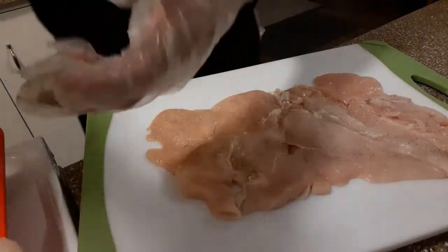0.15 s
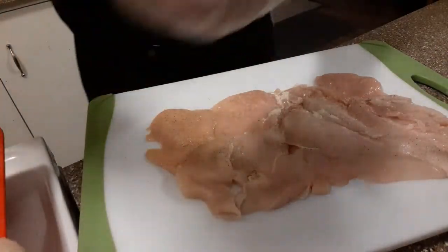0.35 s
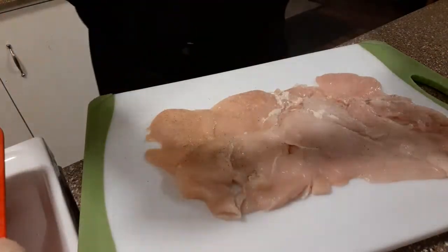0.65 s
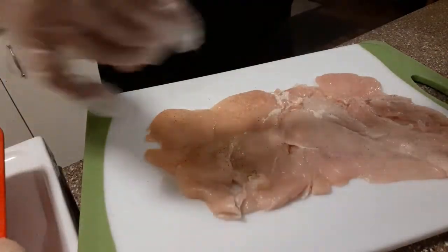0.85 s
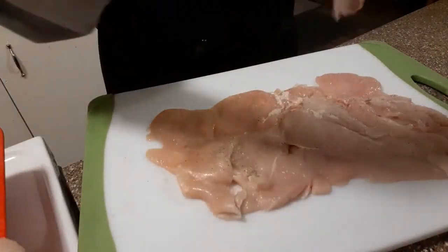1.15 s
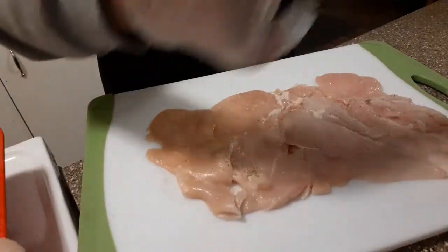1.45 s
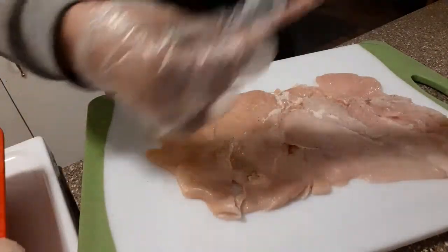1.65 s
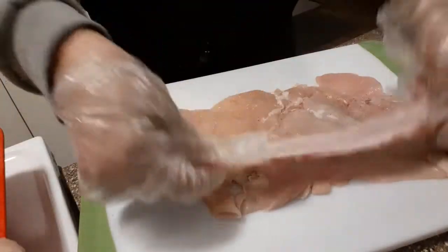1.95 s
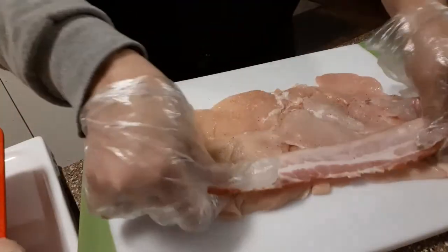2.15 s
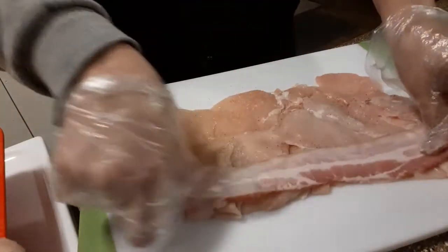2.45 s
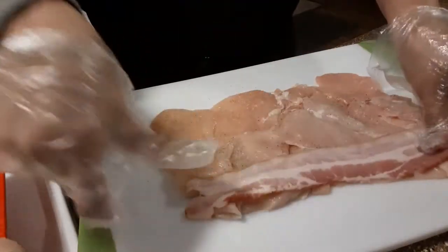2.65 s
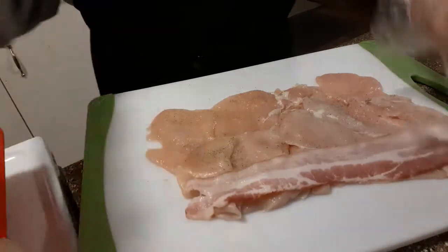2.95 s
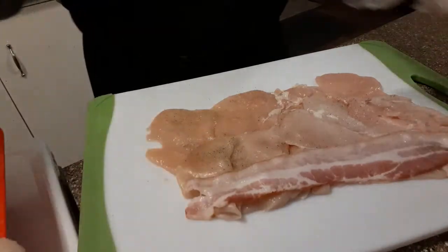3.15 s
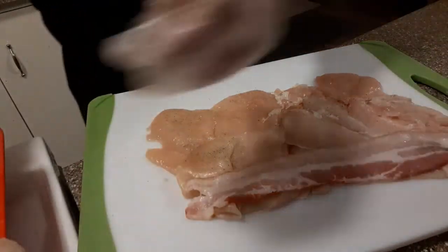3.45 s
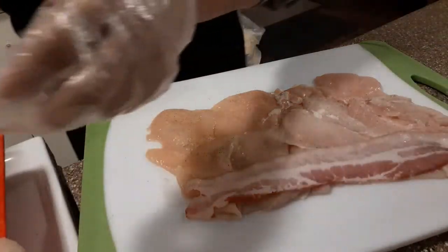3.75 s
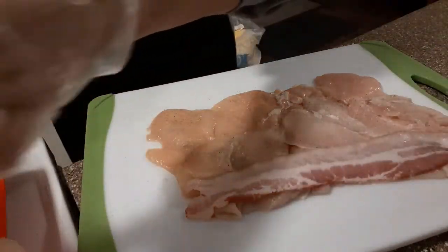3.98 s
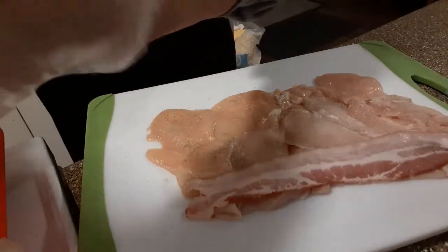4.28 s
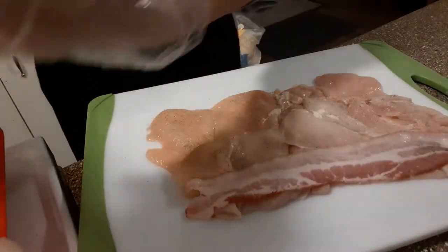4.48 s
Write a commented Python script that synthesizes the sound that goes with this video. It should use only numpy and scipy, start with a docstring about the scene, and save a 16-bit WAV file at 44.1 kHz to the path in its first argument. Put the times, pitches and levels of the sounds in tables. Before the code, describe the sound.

Thin plastic gloves crinkle and crackle close by in uneven swells, with a few sharp pops, over faint hiss and low room rumble.

```python
"""In a kitchen, thin plastic gloves rustle close to a two-port camera microphone as hands lay strips of meat on a board.
The film buckles in random snaps, up to thousands a second, under overlapping swells of movement; a few pops stand out.
A short room tail and a near echo colour the gloves. Shaped noise makes the low rumble with its fuzzy hum,
and a steady faint hiss. Quiet narrow bands of the low range drop out."""
import sys
import numpy as np
from scipy import signal
from scipy.fft import rfft, irfft
from scipy.io import wavfile
from scipy.ndimage import uniform_filter1d

SR = 44100
rng = np.random.default_rng(int(sys.argv[2]) if len(sys.argv) > 2 else 0)


def voltage_ratio(level):
    """Linear amplitude factor for a level in decibels (scalar or array-like)."""
    return 10 ** (np.asarray(level, float) / 20)


def digitize_waveform(pressure):
    """Quantize a signal to 16-bit integers and store it at the path in sys.argv[1].

    Rows of a 2-D input are taken as channels; values are limited to [-1, 1].
    """
    field = np.atleast_2d(pressure).T
    bounded = np.clip(field, -1, 1)
    quanta = np.round(bounded * 32767).astype(np.int16)
    wavfile.write(sys.argv[1], SR, quanta)


N = 203742


def evened(x):
    """Scales to rms 1 over all channels together."""
    return x / np.sqrt(np.mean(x ** 2) + 1e-20)


def read_spectrum(points, hz):
    """Reads a spectrum table on a log-frequency axis."""
    f, value = np.transpose(points)
    return np.interp(np.log(hz + 1), np.log(f + 1), value)


def along(rows):
    """Joins the points of each column of a time table into one value a sample."""
    s, *columns = np.transpose(rows)
    return [np.interp(np.arange(N) / SR, s, column) for column in columns]


def coloured(x, gain):
    """Filters by a gain that is a function of frequency."""
    return irfft(rfft(x) * gain(np.fft.rfftfreq(N, 1 / SR)), N)


def drift(size):
    """Slow random wander of rms 1, smooth over about size samples."""
    noise = rng.standard_normal(N)
    return evened(uniform_filter1d(uniform_filter1d(noise, size), size))


def left_right(side_db):
    """Gains of both ports that split a left-over-right difference in dB evenly."""
    return voltage_ratio(np.array([[0.5], [-0.5]]) * side_db)


# Colour of rustle and hiss at each port:
# (frequency [Hz], left density [dB per Hz, relative], right density [dB per Hz, relative])
PORT_COLOUR = [(70, -72, -55), (204, -25, -17.5), (302, -25, -22), (410, -13, -32.5), (515, -15.5, -21),
               (605, -16, -16), (790, -14.5, -16), (945, -12, -23), (1386, -14.5, -10.5),
               (1720, -13.5, -15), (2150, -9, -11.5), (3700, -10, -10.5), (4070, -10, -9),
               (5550, -10.5, -11), (7870, -10, -7), (8470, -1, -8.5), (9820, -5, -7.5), (11570, -2, -3.5),
               (15770, -5, -9), (15700, -33, -38)]


def port_colour(hz):
    """Colour of rustle and hiss at each port, as a gain."""
    f, *sides = np.transpose(PORT_COLOUR)
    return voltage_ratio([read_spectrum(np.transpose([f, side]), hz) for side in sides])


# Hand moves, each a swell of crumpling:
# (peak time [s], rise [s], fall [s], bright level at peak [dB], middle body against bright [dB])
HAND_MOVES = [(.04, 0.23, 0.067, -45, -10), (0.138, 0.045, 0.039, -46, -9), (.2, 0.025, 0.03, -49.5, -9.5),
              (0.269, 0.036, 0.063, -52, -9.5), (0.352, 0.011, 0.14, -44.5, -10),
              (0.432, .05, 0.028, -39.5, -10), (0.481, .04, 0.059, -42.5, -8.5),
              (0.644, 0.08, .1, -34.5, -12), (.75, 0.12, 0.12, -44.5, -4.5), (.83, 0.065, 0.086, -34.5, -8),
              (0.938, .08, 0.024, -37, -10.5), (1.1, 0.19, .2, -43.5, -16),
              (1.309, 0.35, 0.11, -34.5, -8.5), (1.409, 0.051, 0.14, -37.5, -11),
              (1.57, .08, 0.038, -50, -9), (1.691, 0.15, 0.066, -43, -9.5), (1.819, 0.19, 0.19, -40, -12),
              (2.001, 0.045, 0.21, -37, -7.5), (2.06, 0.11, 0.17, -44, -3), (2.2, .12, 0.22, -35, -9.5),
              (2.36, 0.36, 0.17, -34.5, -11), (2.551, 0.17, 0.024, -36, -12),
              (2.68, 0.25, 0.084, -46.5, -11.5), (2.843, 0.13, 0.16, -34, -10.5),
              (3.108, .05, 0.054, -40, -13), (3.265, 0.1, .18, -36.5, -8), (3.37, 0.18, 0.033, -37.5, -5.5),
              (3.501, .15, 0.17, -44.5, -6), (3.579, 0.21, 0.037, -38.5, -10),
              (3.68, 0.087, 0.09, -51, -15), (3.82, 0.079, 0.17, -33, -11), (3.93, 0.11, 0.15, -40, -7),
              (4.08, .15, 0.13, -42, -14), (4.23, 0.11, 0.046, -37.5, -7.5), (4.33, 0.22, 0.2, -42, -9.5),
              (4.431, 0.099, 0.033, -41, -10.5), (4.49, 0.021, 0.022, -41.5, -8.5),
              (4.572, .05, 0.083, -38.5, -9)]


def moves():
    """Levels in dB of the bright crumpling and of the middle body: the powers of all moves add up."""
    peak_s, rise_s, fall_s, peak_db, body_db = np.transpose(HAND_MOVES)[..., None]
    t = np.arange(0, N + 64, 64) / SR
    # each move alone is 10 dB under its peak one rise before and one fall after it
    bright_db = peak_db - 10 * np.maximum((peak_s - t) / rise_s, (t - peak_s) / fall_s)
    powers = [(voltage_ratio(level) ** 2).sum(0) for level in (bright_db, bright_db + body_db)]
    return [np.interp(np.arange(N) / SR, t, 10 * np.log10(p)) for p in powers]


def folds(count, shared, tonal):
    """Short dying bursts, each with its own pitch; a fold radiates unevenly, so the ports hear only a part alike."""
    t = np.arange(200) / SR
    same, left, right = rng.standard_normal((3, count, len(t)))
    burst = np.array([left, right]) * np.sqrt(1 - shared) + same * np.sqrt(shared)
    pitch_hz = np.linspace(1000, 16000, count)[:, None]
    # start phase in cycles: random for each fold, partly different at each port
    phase = rng.random((count, 1)) + 0.63 * rng.random((2, count, 1))
    burst += tonal * np.sin(2 * np.pi * (pitch_hz * t + phase))
    decay_s = 0.0005 * rng.uniform(0.5, 2.42, (count, 1))
    burst *= np.exp(-t / decay_s)
    return burst / np.linalg.norm(burst, axis=2, keepdims=True)


# Head start of the left port: (time [s], lead [samples])
LEFT_LEAD = [(0, 2), (2.5, 3), (2.8, 18), (4.62, 18)]


def crackle(spread_db=2.0, clump_db=1.0, flurry_db=0.28, thinning=0.7, busy_db=-38):
    """Random snaps of uneven size in clumps, rms 1; gentle movement folds the film less often, in lumps."""
    snaps_per_s, kinds = 9000, 32  # the rate is for a fully busy film
    bright_db = moves()[0]
    busy = np.clip(voltage_ratio(thinning * (bright_db - busy_db)), 0.1, 1)
    happens = rng.random(N) < busy * snaps_per_s / SR
    size = voltage_ratio(spread_db * np.minimum(rng.exponential(1, N), 5)) * happens
    clumps_db = clump_db * drift(size=150) + flurry_db * drift(size=900)
    size *= voltage_ratio(clumps_db / busy ** 0.2) / np.sqrt(busy)  # rarer snaps are larger
    kind = rng.integers(0, kinds, N)
    bursts = folds(count=kinds, shared=0.24, tonal=1.23)
    early = np.minimum(np.arange(N) + along(LEFT_LEAD)[0].astype(int), N - 1)
    heard = [(size[early], kind[early]), (size, kind)]
    snapped = np.array([
        sum(signal.oaconvolve(s * (k == j), bursts[port, j])[:N] for j in range(kinds))
        for port, (s, k) in enumerate(heard)])
    # all kinds together are made white
    blend = np.sqrt((abs(rfft(bursts, 512)) ** 2).mean(1))
    burst_hz = np.fft.rfftfreq(512, 1 / SR)
    return evened(coloured(snapped, lambda hz: [1 / np.interp(hz, burst_hz, b) for b in blend]))


# Where the hands are: (time [s], left over right [dB])
HAND_SIDE = [(0, 1), (.6, -1.5), (2.55, -2), (3.0, 2), (4.62, 2.5)]
# Drag of the gloves over meat and board: (time [s], low rub against the middle body [dB])
GLOVE_RUB = [(0, -9.5), (.31, -11), (.4, -10), (.6, -11.5), (1.4, -11), (2.0, -11.5), (2.25, -9.5),
             (2.33, -5.5), (2.56, -6), (2.68, -11), (2.88, -7), (3.1, -13.5), (3.9, -11), (4.2, -12.5),
             (4.42, -12), (4.62, -12.5)]


def rustle():
    """The crackle takes the port colour; rubbing and squeezing shift its low and middle shares."""
    low_hz, mid_hz = 1500, 5000  # where low meets middle and middle meets high
    high_db, mid_db = moves()
    low_db = along(GLOVE_RUB)[0]
    toned = coloured(crackle(), port_colour)
    low = coloured(toned, lambda hz: 1 / np.sqrt(1 + (hz / low_hz) ** 8))
    high = coloured(toned, lambda hz: 1 / np.sqrt(1 + (mid_hz / (hz + 1)) ** 8))
    mid = coloured(toned, lambda hz: 1 / np.sqrt((1 + (low_hz / (hz + 1)) ** 8) * (1 + (hz / mid_hz) ** 8)))
    body = evened(mid) + voltage_ratio(low_db) * evened(low)
    mix = voltage_ratio(high_db) * evened(high) + voltage_ratio(mid_db) * body
    return left_right(along(HAND_SIDE)[0]) * mix


# Rumble spectrum: (frequency [Hz], density [dB per Hz, relative])
RUMBLE_COLOUR = [(12, -54), (20, -18), (65, -8.5), (97, -1.5), (113, 0), (248, -6.5), (315, -13),
                 (362, -12), (400, -15.5), (520, -59), (880, -120)]
# Rumble likeness of the ports: (frequency [Hz], left-right correlation [-1 to 1])
RUMBLE_LIKENESS = [(60, 0.99), (130, 0.77), (290, 0.44), (640, 0.36), (1410, -0.06), (3100, 0.0),
                   (6820, -0.01), (15000, 0.0)]
# Rumble course, before its random waver: (time [s], level [dB])
RUMBLE_LEVEL = [(0, -62), (.3, -64.5), (.68, -57.5), (.85, -60.5), (1.5, -61.5), (1.65, -64.5),
                (2.35, -58.5), (2.7, -65), (2.83, -59), (3.3, -59.5), (3.65, -63), (4.1, -60.5),
                (4.62, -57)]


def kitchen():
    """Low rumble of the house, most alike at both ports in the bass, and the microphone's faint hiss."""
    hum_hz, hum_width_hz, hum_db = 112.8, 5.1, 4.5  # a fuzzy hum stands out of the rumble
    waver_db, hiss_db = 2.3, -53.5
    left, other = rfft(rng.standard_normal((2, N)))
    hz = np.fft.rfftfreq(N, 1 / SR)
    same = np.clip(read_spectrum(RUMBLE_LIKENESS, hz), -1, 1)
    pair = np.array([left, same * left + np.sqrt(1 - same ** 2) * other])
    hum_lift_db = hum_db / (1 + ((hz - hum_hz) / hum_width_hz) ** 2)
    rumble = evened(irfft(pair * voltage_ratio(read_spectrum(RUMBLE_COLOUR, hz) + hum_lift_db), N))
    rumble *= voltage_ratio(along(RUMBLE_LEVEL)[0] + waver_db * drift(size=2500))
    hiss = evened(coloured(rng.standard_normal((2, N)), port_colour))
    return rumble + voltage_ratio(hiss_db) * hiss


# Snaps that stand out: (time at the right port [s], level [dB], pitch [Hz], left over right [dB])
LOUD_SNAPS = [(0.0282, -32, 12100, 10), (0.0383, -28, 8400, -2), (0.0556, -29, 5330, -2),
              (0.144, -32, 11400, 12), (0.184, -25.5, 10100, 2), (0.1974, -41, 11200, 5),
              (0.2084, -32.5, 8400, -9), (0.2503, -40, 8700, 5), (0.3392, -24.5, 13500, 4.5),
              (0.4285, -18, 10600, -2), (0.4667, -20.5, 10100, -5), (1.4044, -30, 7450, 6),
              (2.838, -19, 11600, 4), (3.1067, -36, 14200, -1), (3.1552, -36, 14200, -4),
              (3.2808, -14, 12800, 9), (3.919, -23, 11300, 7), (4.2254, -38, 12500, 7),
              (4.4862, -30, 9600, 7), (4.5306, -26, 10900, 5)]


def snaps(ring_s=0.0009, tonal=1.2, trail_db=-19, trail_s=0.004):
    """Single folds that pop: a brief ring at their pitch in a burst of noise, then the crease crackles on."""
    out = np.zeros((2, N + 1200))
    t = np.arange(1200) / SR
    noise = rng.standard_normal((len(LOUD_SNAPS), 2, len(t)))
    lead = along(LEFT_LEAD)[0]
    for (s, db, hz, side_db), puff in zip(LOUD_SNAPS, noise):
        puff = np.diff(uniform_filter1d(puff, size=2), prepend=0)
        ring = tonal * np.sin(2 * np.pi * hz * t) + 0.31 * puff
        pop = ring * np.exp(-t / ring_s) * np.minimum(t / 0.0005, 1)  # half a millisecond of attack
        pop += voltage_ratio(trail_db) * puff * np.exp(-t / trail_s)
        pop *= voltage_ratio(db) * left_right(side_db)
        at = round(s * SR)
        first = at - int(lead[at])
        out[0, first:first + len(t)] += pop[0]
        out[1, at:at + len(t)] += pop[1]
    return out[:, :N]


# Decay of the room: (frequency [Hz], time to fall by 60 dB [s])
ROOM_DECAY = [(400, 0.23), (2000, 0.13), (8000, 0.13), (16000, 0.11)]


def room(x, wet_db):
    """Sparse taps of random sign die band by band, others for each port; three tails take turns in a steady cycle."""
    taps = np.zeros((6, SR // 2))
    start = np.arange(100, SR // 2 - 20, 20)
    place = start + rng.integers(0, 20, (6, len(start)))
    sign = rng.choice([-1., 1.], (6, len(start)))
    np.put_along_axis(taps, place, sign, 1)
    hz, t, z = signal.stft(taps, SR, nperseg=256)
    decay = voltage_ratio(-60 * t / read_spectrum(ROOM_DECAY, hz)[:, None])
    tails = signal.istft(z * decay, SR, nperseg=256)[1].reshape(3, 2, -1)
    turn = np.pi * (np.arange(N) / 4000 + np.arange(3)[:, None, None] / 3)
    fed = np.sqrt(2 / 3) * np.cos(turn) * x  # the three shares keep their total power
    wet = signal.fftconvolve(fed, tails / np.linalg.norm(tails[0, 0]), axes=2)[..., :N].sum(0)
    return x + voltage_ratio(wet_db) * wet


# Near echo at the left port, shifting with the hands: (time [s], delay [ms], share of the direct sound [ratio])
LEFT_ECHO = [(0, 1.65, 0.24), (.3, 1.6, 0.39), (.55, 1.58, 0.43), (1.0, 1.74, .45), (1.5, 1.71, 0.66),
             (1.9, 1.77, 0.27), (2.3, 1.74, 0.12), (3.5, 1.56, 0.12), (4.1, 2.7, 0.073), (4.62, 2.2, 0.33)]


def hollowed(x, patchy_db=1.74, reach_hz=1900):
    """A near echo off board and counter combs the low rustle; drifting dips and lifts differ at each port."""
    hz, t, z = signal.stft(x, SR, nperseg=1024, noverlap=768)
    s, *left_echo = np.transpose(LEFT_ECHO)
    right_echo = 2.04, -0.045  # delay in ms and share: inverted and steady
    delay_ms, share = (np.array([[np.interp(t, s, left)], [np.full(len(t), right)]])
                       for left, right in zip(left_echo, right_echo))
    low = 1 / (1 + (hz[:, None] / reach_hz) ** 4)
    echo = np.clip(share, -1, 1) * np.exp(-2j * np.pi * hz[:, None] * delay_ms / 1000)
    comb = 1 + low * echo
    patches = uniform_filter1d(rng.standard_normal(z.shape), size=4, axis=1)
    patches = evened(uniform_filter1d(patches, size=30, axis=2))
    hollow = z * comb * voltage_ratio(patchy_db * low * patches)
    return signal.istft(hollow, SR, nperseg=1024, noverlap=768)[1][:, :N]


def quiet_bands_drop_out(x, under_db=-86, cut_db=-30, top_hz=2200, follow=0.7, usual_db=-77):
    """Narrow bands of the low range drop out where they sink under a bar that rises with loudness."""
    hz, t, z = signal.stft(x, SR, nperseg=2048, noverlap=1536)
    power = uniform_filter1d(uniform_filter1d(abs(z) ** 2, size=3, axis=1), size=3, axis=2)
    loud_db = 10 * np.log10(power.mean(1, keepdims=True) + 1e-14)
    bar = voltage_ratio(2 * (under_db + follow * (loud_db - usual_db)))  # as a power
    lost = 1 / (1 + (power / bar) ** 6)
    lost = lost / (1 + (hz[:, None] / top_hz) ** 4)  # mostly in the low range
    return signal.istft(z * voltage_ratio(cut_db * lost), SR, nperseg=2048, noverlap=1536)[1][:, :N]


def scene():
    """The gloves in their room and near echo, over the kitchen's rumble and the hiss."""
    gloves = rustle() + snaps()
    return hollowed(room(gloves, wet_db=-4.0)) + kitchen()


def low_pass(x):
    """Removes everything above the highest recorded frequency."""
    return signal.sosfilt(signal.butter(12, 17000, fs=SR, output="sos"), x)


def record(dry):
    """Quiet narrow bands of the low range drop out, and the treble is cut between 15.9 and 16.05 kHz."""
    limited = coloured(quiet_bands_drop_out(dry), lambda hz: np.clip((16050 - hz) / 150, 0, 1))
    return low_pass(limited)


dry = scene()
out = record(dry)
digitize_waveform(out)
```